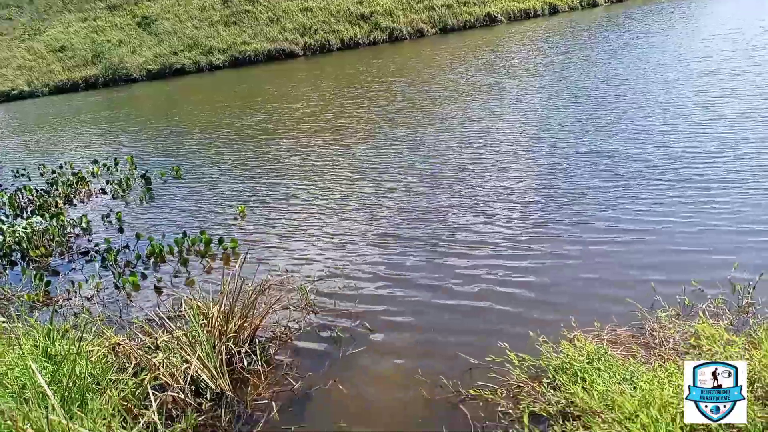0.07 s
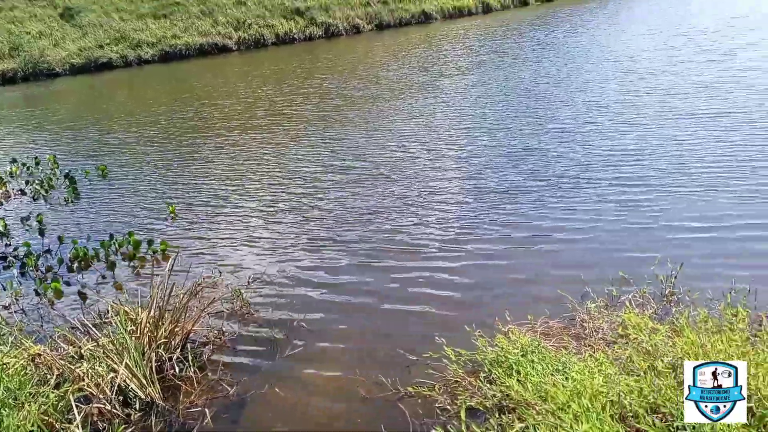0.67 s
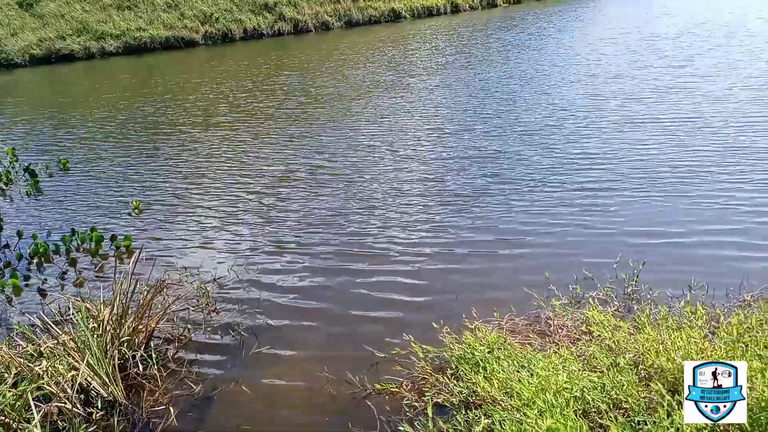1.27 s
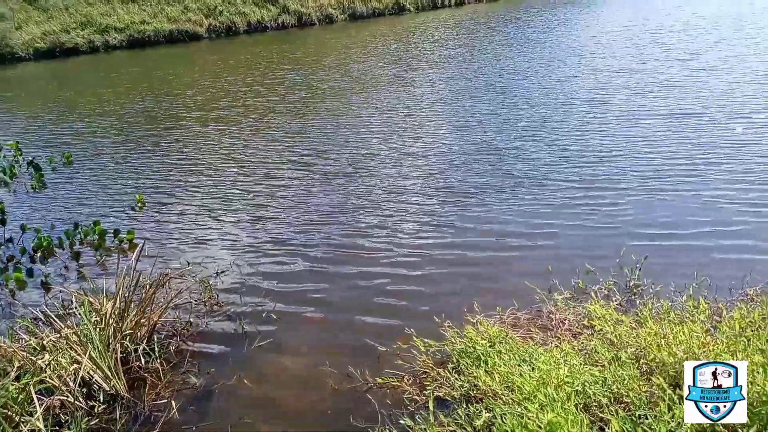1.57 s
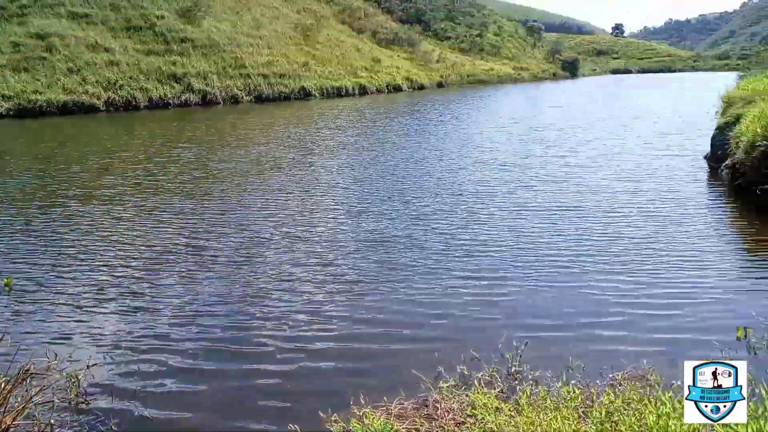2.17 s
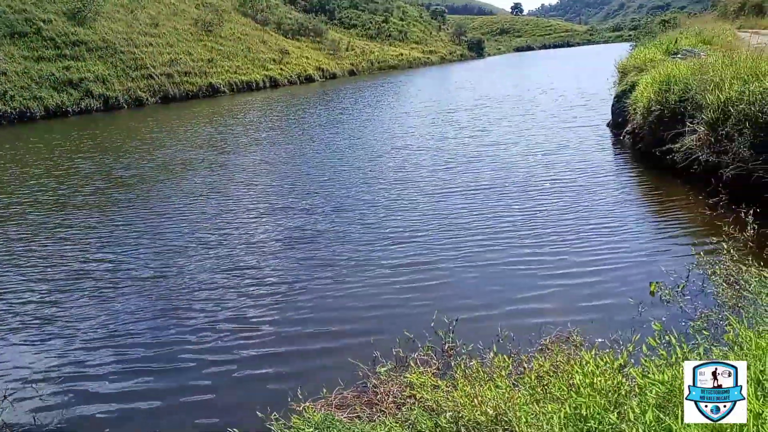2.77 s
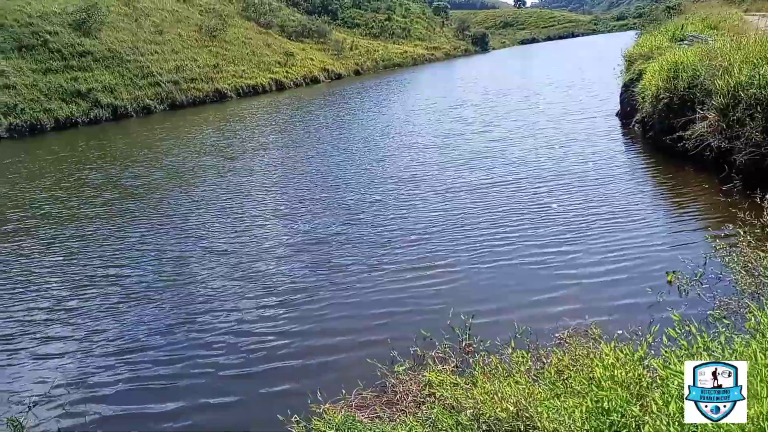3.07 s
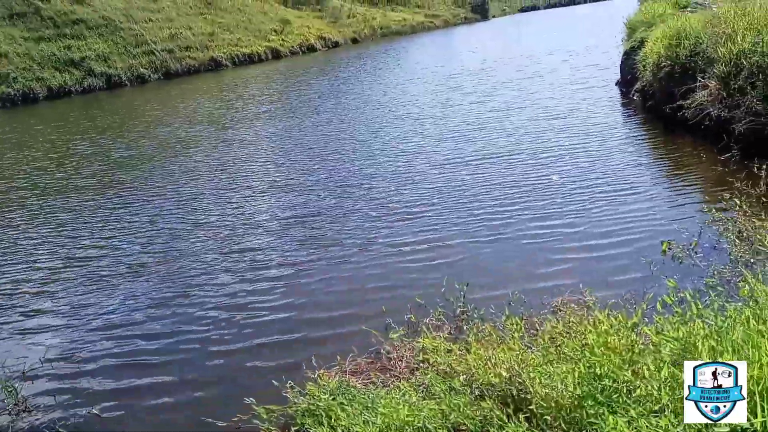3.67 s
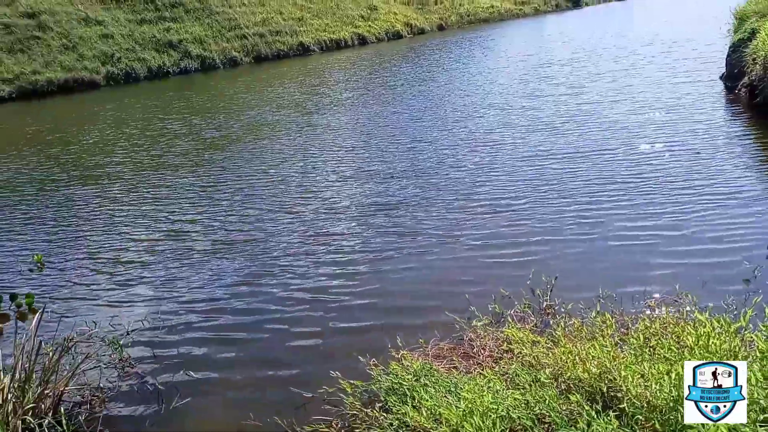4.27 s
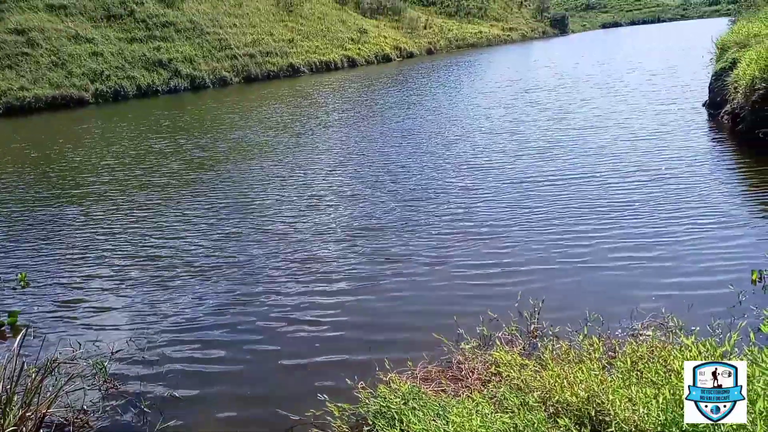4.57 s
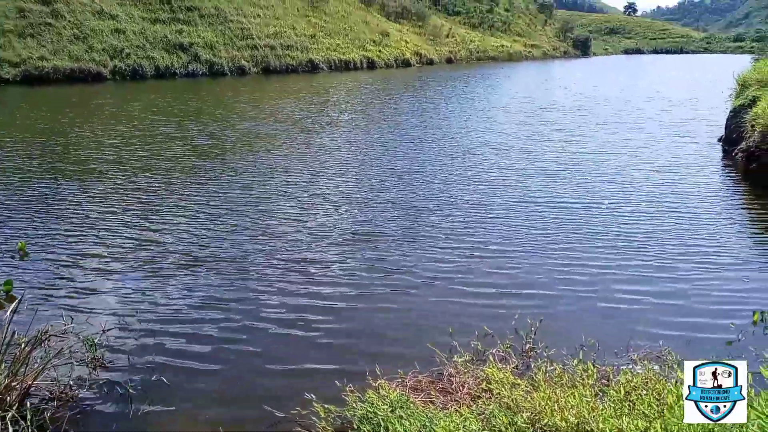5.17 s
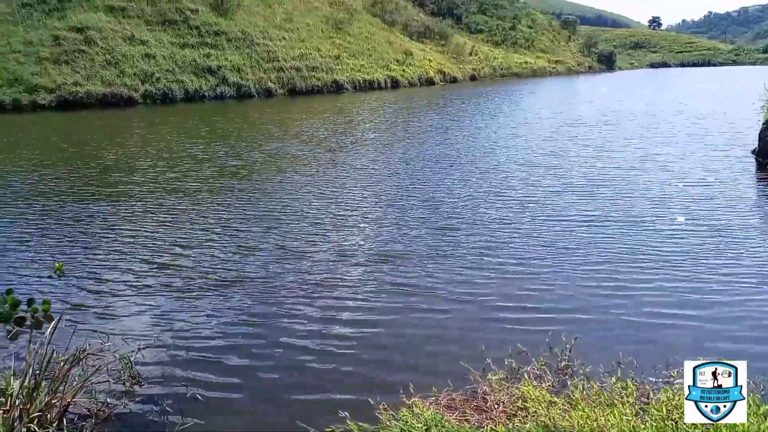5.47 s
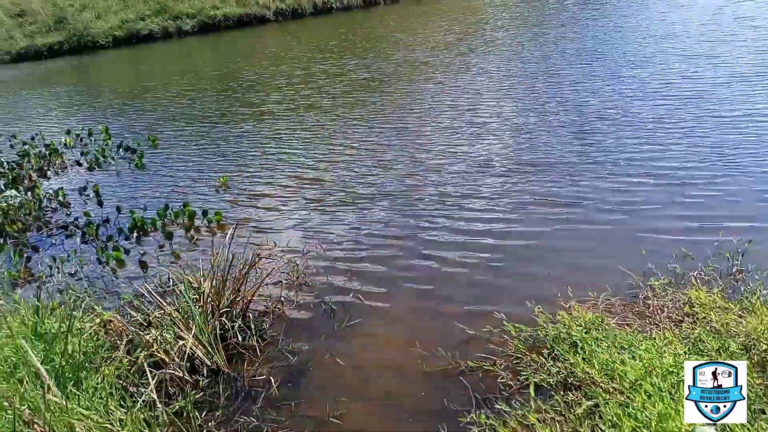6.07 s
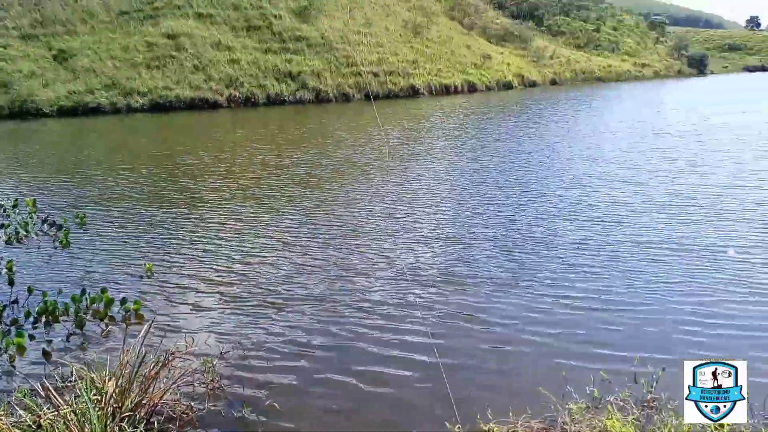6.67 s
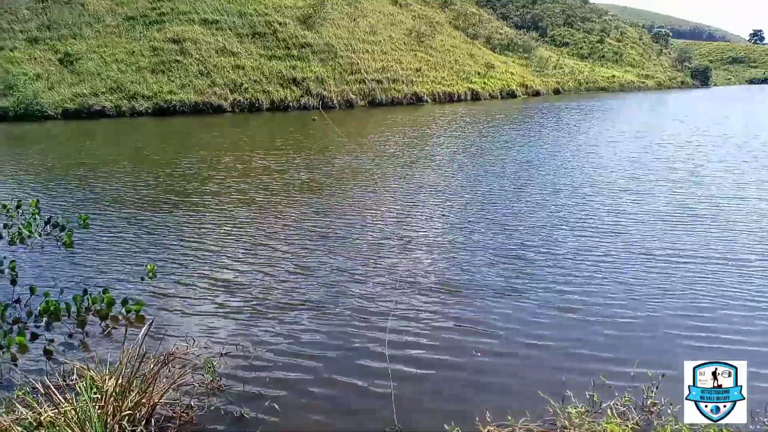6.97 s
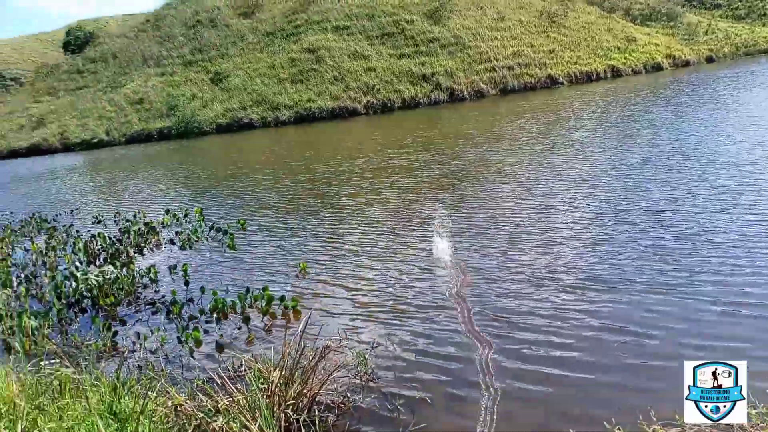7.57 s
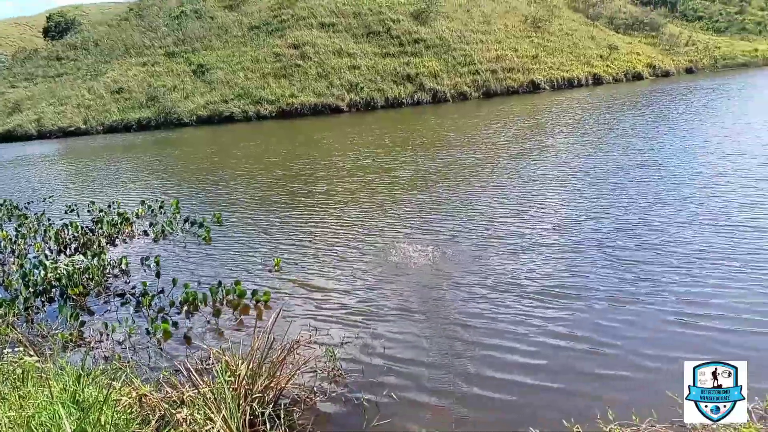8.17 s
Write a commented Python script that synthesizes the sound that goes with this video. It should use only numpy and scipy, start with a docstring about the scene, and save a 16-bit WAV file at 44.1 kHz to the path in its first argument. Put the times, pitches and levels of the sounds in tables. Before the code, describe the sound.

A thrown magnet on a rope slaps and plunks into water after a stretch of high insect buzzing, crickets and faint rope handling.

```python
"""A heavy magnet on a rope is thrown into a pond from a grassy bank.
Throughout, a high insect buzz swells in bouts over a second, steady one; a bird whistles now and then,
and crickets join in, scraping their wings. At first hands shift on the rope, whose fibres catch and
slip. At about 6 s the tackle snaps tight and the rope hisses out. At 7.4 s the magnet slaps the water
and its air cavity closes with a plunk. Last, spray patters back, trapping small bubbles that ring."""
import sys
import numpy as np
from scipy import signal
from scipy.fft import rfft, irfft
from scipy.io import wavfile

SR = 44100
rng = np.random.default_rng(int(sys.argv[2]) if len(sys.argv) > 2 else 0)


def log_audio(samples):
    """Write samples as a 16-bit WAV file to the path given in sys.argv[1]."""
    # one column per channel
    frames = np.atleast_2d(samples).T
    # limit to full scale, then quantise
    limited = np.clip(frames, -1, 1)
    pcm = np.round(limited * 32767).astype(np.int16)
    wavfile.write(sys.argv[1], SR, pcm)


N = 371763
T = np.arange(N) / SR
HZ = np.fft.rfftfreq(N, 1 / SR)

# Still air and hiss. Each row: frequency in Hz, relative spectral level in dB.
AIR_SPECTRUM = [(18, -56), (30, -1.5), (55, -32.5), (413, -17.5), (1120, -21.5), (1380, -17), (4150, -25.5),
                (5680, -20.5), (7010, -14), (7580, -24.5), (8420, -32.5), (10100, 4), (11200, -8.5),
                (12800, 1.5), (15800, -8.5)]
# Soft swells of the low murmur. Each row: centre in seconds, half length in seconds, rise in dB.
MURMUR_RISES = [(.3, .4, 4), (1.88, .1, 3), (2.43, .08, 3), (2.87, .05, 4), (5.68, .13, 6), (6.3, .35, 4)]
# Distant insects. Each row: centre frequency in Hz, width in Hz, level in dB before the swell.
CHORUS_BANDS = [(4710, 330, -75), (5530, 390, -75.5), (6290, 160, -79.5), (7016, 210, -76)]
# The swell of their chorus. Each row: time in seconds, gain in dB.
CHORUS_GAIN = [(0, -3), (1.2, -4), (2.3, 0.5), (3.4, -1.5), (3.9, -10), (4.7, -9), (5.2, -5), (8.4, 0)]
# Calls across the water. Each row: centre in seconds, a third of the length in seconds, pitch in Hz,
# level in dB, glide in octaves a second.
DISTANT_CALLS = [(2.015, .11, 332, -76.5, -0.31), (2.1, .05, 900, -80, .4), (2.09, .05, 1350, -81, 0),
                 (3.796, .06, 3400, -81, -0.75), (4.497, .11, 2640, -81.5, -0.63),
                 (5.158, 0.038, 5000, -71, 0.37), (5.679, 0.14, 1495, -71.5, .1),
                 (5.699, .11, 1730, -75, -0.11), (5.79, 0.11, 3480, -79, -.25),
                 (7.088, 0.063, 3050, -71.5, -0.94)]
# The main cricket grows higher and louder. Each row: time in seconds, pitch in Hz, peak level in dB.
CRICKET_CONTOUR = [(2.6, 6400, -59.5), (3.45, 6340, -60.5), (3.7, 6550, -57), (4.6, 6650, -57),
                   (5.4, 6650, -55.5), (7.1, 6630, -57), (8.4, 6740, -59)]
# Its phrases. Each row: start in seconds, chirps, strokes in the first chirp, strokes in the others.
CRICKET_PHRASES = [(2.57, 4, 1, 1), (2.949, 5, 2, 2), (3.431, 4, 2, 2), (3.81, 5, 2, 2), (4.289, 5, 3, 2),
                   (4.77, 5, 3, 2), (5.251, 4, 3, 2), (5.683, 1, 2, 2), (5.757, 7, 3, 2), (6.442, 6, 2, 2),
                   (7.077, 2, 2, 1), (7.684, 1, 2, 2), (7.759, 7, 3, 2)]
# A second, lower cricket. Each row: time in seconds, peak level in dB.
LOW_CRICKET_CHIRPS = [(1.421, -60), (2.744, -59), (4.215, -56), (5.631, -54.5), (7.005, -59)]
# One pulse of the insect buzzes. Each row: time in seconds, pitch in Hz, relative level in dB.
BUZZ_STROKE = [(0, 10300, -24), (.0007, 10370, -1), (.0032, 10400, 0), (.0058, 10360, 1),
               (.007, 10050, -11), (.0085, 9700, -15), (.0112, 9250, -28)]
# Bouts of the higher buzz. Each row: centre in seconds, half length in seconds, gain in dB.
HIGH_BUZZ_BOUTS = [(.37, .17, 5), (1.66, .15, 8), (2.02, .08, -3), (2.6, .12, 7.5), (2.92, .16, 3),
                   (3.58, .23, 6), (4.45, .3, 6), (5.35, .25, 2.5), (5.68, .05, -5), (6.3, .55, 4.5),
                   (8.15, .17, 5)]
# The top of each bird whistle. Each row: time in seconds, pitch in Hz, level in dB before the waver.
WHISTLE_TOPS = [(.008, 2780, -59), (2.11, 2830, -51), (6.29, 2850, -51.5)]

# Rope sliding on hands and grass. Each row: frequency in Hz, relative spectral level in dB.
ROPE_SPECTRUM = [(88, -70), (150, -38), (327, -16), (474, -33), (727, -9), (833, -13.5), (937, -9),
                 (1520, -11.5), (2680, -8.5), (3810, -6.5), (6700, -12), (8810, -33.5), (12500, -2),
                 (14100, -1), (15800, -9)]
# Rope pulled through the hand. Each row: centre and half length in seconds, body and fizz in dB.
# Body is the part of a texture below 8500 Hz, fizz the part above.
ROPE_PULLS = [(.2, .05, -67, -54), (.285, .042, -59, -48), (1.61, .04, -72, -53), (1.73, .04, -80, -56),
              (3.4, .06, -76, -56), (6.12, .04, -80, -54), (6.205, .015, -60, -54), (6.298, .012, -61, -43),
              (6.465, .05, -53, -42), (6.665, .025, -64, -44), (6.785, .03, -55, -49),
              (6.897, .025, -56, -41), (7.27, .07, -65, -52)]
# Short brushes and ticks. Each row: centre and half length in seconds, body and fizz in dB.
ROPE_BRUSHES = [(.621, .001, -73, -43.5), (1.415, .001, -71, -42.5), (1.887, .025, -64.5, -51),
                (2.186, .008, -74, -52), (2.21, .007, -61, -37), (2.391, .02, -55.5, -42),
                (2.446, .012, -64, -48), (2.49, .04, -68, -54), (2.972, .023, -70, -48),
                (3.081, .026, -65, -46.5), (3.377, .001, -71, -42), (3.575, .028, -67, -48),
                (4.065, .001, -75, -45), (4.958, .022, -67, -49.5), (6.163, .007, -48, -35),
                (6.342, .003, -46.5, -41), (6.391, .003, -52.5, -48), (6.505, .004, -53, -34),
                (6.678, .007, -49, -38), (6.848, .0025, -46, -34.5), (6.898, .0065, -57, -33.5),
                (7.127, .0026, -60.5, -33.5)]
# Resonances of the squeaking rope. Each row: frequency in Hz, width in Hz, level in dB.
SQUEAK_BANDS = [(2900, 110, -58), (4150, 150, -62), (5150, 330, -56)]
# Flicks of slack rope. Each row: start in seconds, level in dB, decay time in seconds.
SLACK_FLICKS = [(1.413, -63, .012), (2.328, -67, .005), (2.865, -68, .01), (6.34, -48, .004),
                (6.708, -42.5, .004), (6.7156, -33, 0.003), (6.722, -49, 0.069), (6.837, -46, .004),
                (6.847, -48, .005), (7.027, -56, .012)]
# Their dull tone. Each row: frequency in Hz, relative spectral level in dB.
FLICK_SPECTRUM = [(200, -19), (600, -2), (1100, 1.5), (2800, -2), (4500, -15), (7000, -30), (16000, -45)]
# Modes of the tackle. Each row: frequency in Hz, relative level in dB, t60 and delay in seconds.
TACKLE_MODES = [(990, -25, .0037, .00087), (2756, -15, .005, .00041), (3770, -14.2, .0017, .00078),
                (5390, -19.5, .0045, .00024), (12770, -2.4, .0015, 0), (14300, -6.2, .0006, 0)]

# Water torn by the magnet. Each row: frequency in Hz, relative spectral level in dB.
SPLASH_SPECTRUM = [(59, -67.5), (100, -29), (129, -34), (219, -20), (431, -14), (618, -5), (849, -19),
                   (1170, -6), (1440, -14), (2200, -12.5), (2500, -13.5), (4720, -16), (8550, -27),
                   (12500, 7), (15800, -1)]
# Four bursts of it: the slap, the cavity opening, its collapse, the rebound jet.
# Each row: start, rise and decay time in seconds, body and fizz in dB.
SPLASH_BURSTS = [(7.362, .002, .004, -44, -31), (7.366, .016, .034, -38.5, -41),
                 (7.44, .045, .04, -42.5, -38.5), (7.549, .002, .035, -47, -39)]
# The flat face cracks on the surface; the air cavity rings as it opens and again as it pinches off.
# Each row: frequency in Hz, peak level in dB, rise and t60 in seconds, glide in octaves a second.
SLAP_MODES = [(2950, -27, .0005, .009, 0), (3750, -27, .0003, .006, 0), (4800, -31, .0003, .005, 0)]
OPENING_MODES = [(390, -41, .0036, .19, -21), (1210, -51, .0027, .06, 2)]
PLUNK_MODES = [(100, -52, .006, .11, -2.5), (195, -33, .004, .055, 4.5), (289, -19.5, .0033, .06, -.5),
               (742, -21.5, .002, .034, 4), (1230, -29.5, .0015, .022, 5)]
# Large bubbles. Each row: start in seconds, starting pitch in Hz, peak level in dB.
LARGE_BUBBLES = [(7.452, 1190, -46), (7.473, 335, -42), (7.537, 530, -40), (7.5635, 630, -34),
                 (7.584, 550, -41), (7.663, 1650, -40.5), (7.839, 1090, -43.5), (7.88, 1140, -43.5),
                 (7.922, 615, -43), (8.0, 1090, -38), (8.002, 710, -40), (8.113, 1150, -46)]
# The patter of spray. Each row: frequency in Hz, relative spectral level in dB.
SPRAY_SPECTRUM = [(120, -64.5), (200, -30), (681, -4), (879, -10), (1140, 0), (1440, -6.5), (1640, 0.5),
                  (1830, -3), (6450, -9.5), (8640, -25), (10200, -22), (12500, -1.5), (15800, -12.5)]
# Showers falling back. Each row: centre and half length in seconds, body and fizz in dB.
SPRAY_SHOWERS = [(7.655, .085, -52.5, -51), (7.85, .03, -55, -62), (8.015, .095, -48, -49),
                 (8.26, .13, -72, -55), (8.415, .015, -55, -52)]
# Single drops. Each row: start in seconds, relative level in dB, starting pitch in Hz.
SINGLE_DROPS = [(7.6352, -30.5, 2250), (7.8507, -34, 2090), (8.0487, -36, 1560), (8.1254, -36, 5120),
                (8.1653, -28.5, 4500), (8.2133, -41, 4100), (8.3103, -28, 4700), (8.3544, -39, 6600),
                (8.3793, -33, 6620), (8.4157, -30, 3800), (8.4224, -30.5, 6160)]


def amp(db):
    """Amplitude grows tenfold for every 20 dB."""
    return 10 ** (np.asarray(db) / 20)


def unit(x):
    """Normalisation brings a signal to rms 1."""
    return x / np.sqrt(np.mean(x ** 2) + 1e-20)


def add(mix, s, sound):
    """Superposition: a sound adds to the mix from s seconds on."""
    part = mix[max(round(s * SR), 0):][:len(sound)]
    part += sound[:len(part)]


def colour(x, spectrum):
    """Spectral shaping: the gain follows (Hz, dB) points along a logarithmic frequency axis."""
    hz, db = np.transpose(spectrum)
    return irfft(rfft(x) * amp(np.interp(np.log(HZ + 1), np.log(hz + 1), db)), N)


def band(x, low_hz, high_hz):
    """A band-pass filter with steep, smooth edges."""
    return irfft(rfft(x) / (1 + (low_hz / (HZ + 1)) ** 10) / (1 + (HZ / high_hz) ** 10), N)


def narrow_band(x, hz, width):
    """A Gaussian filter passes the frequencies near hz."""
    return irfft(rfft(x) * np.exp(-.5 * ((HZ - hz) / width) ** 2), N)


def drift(rate_hz):
    """Low-passed noise gives a random fluctuation of rms 1."""
    return unit(irfft(rfft(rng.standard_normal(N)) * np.exp(-np.minimum(HZ / rate_hz, 10) ** 2), N))


def grains(per_s, spread_db):
    """A Poisson process of clicks, a few of them large."""
    size = amp(spread_db * np.minimum(rng.exponential(1, N), 4))
    return unit(size * rng.choice([-1, 1], N) * (rng.random(N) < per_s / SR))


def two_bands(texture, body, fizz):
    """A crossover gives the body and the fizz of a texture their own gains."""
    return body * unit(band(texture, 20, 8500)) + fizz * unit(band(texture, 8500, SR / 2))


def bell(s, half, edge=4):
    """A smooth envelope: 1 at time s, one half at s - half and s + half."""
    return 1 / (1 + abs((T - s) / half) ** edge)


def swells(rows, edge=4):
    """Bell envelopes sum to a body gain and a fizz gain."""
    return sum(amp([[body], [fizz]]) * bell(s, half, edge) for s, half, body, fizz in rows)


def envelope(start, rise, end, decay):
    """A linear rise from start, a hold until end, then exponential decay."""
    return np.clip((T - start) / rise, 0, 1) * np.exp(-np.maximum(T - end, 0) / decay)


def ring_envelope(age, rise, t60):
    """A damped resonance builds up, then loses 60 dB every t60 seconds."""
    return (1 - np.exp(-(age / rise) ** 2)) * np.exp(-np.log(1000) * age / t60)


def phase(hz):
    """Phase in radians is the running integral of frequency."""
    return 2 * np.pi * np.cumsum(hz) / SR


def bank_scatter(x, wet_db, t60):
    """Scattering from the banks adds a faint, decaying tail."""
    t = T[:SR // 2]
    tail = rng.standard_normal(len(t)) * amp(-60 * t / t60) * (t > .004)
    return x + amp(wet_db) * signal.fftconvolve(x, tail / np.linalg.norm(tail))[:N]


def air(noise_db=-75.5, murmur_db=-80.3, flutter_db=2):
    """Broadband ambient noise: an even hiss over a low, wavering murmur."""
    noise = colour(rng.standard_normal(N), AIR_SPECTRUM)
    noise *= amp(noise_db) / np.std(band(noise, 100, 4000))
    swell_db = sum(db * bell(s, half) for s, half, db in MURMUR_RISES)
    murmur = unit(band(noise, 55, 1064)) * amp(murmur_db + swell_db + flutter_db * drift(14))
    middle = amp(-2.5) * band(noise, 1074, 4200)
    treble = amp(-5.5) * band(noise, 3900, 9300)
    hiss = amp(-2) * band(noise, 11300, SR / 2)
    return murmur + middle + treble + hiss


def insect_chorus(throb_db=3.5):
    """Incoherent summation: many far insects merge into throbbing bands of noise."""
    out = np.zeros(N)
    for hz, width, db in CHORUS_BANDS:
        voices = narrow_band(rng.standard_normal(N), hz, width)
        out += amp(db) * unit(voices * amp(throb_db * drift(18)))
    return out * amp(np.interp(T, *np.transpose(CHORUS_GAIN)))


def far_calls(blur=.055):
    """Spectral broadening: distance smears each call into a narrow, fuzzy band."""
    out = np.zeros(N)
    for s, third, hz, db, glide in DISTANT_CALLS:
        t = np.arange(-1.5 * third, 1.5 * third, 1 / SR)
        scatter = (drift(blur * hz) + 1j * drift(blur * hz))[:len(t)]
        tone = (scatter * np.exp(1j * phase(hz * 2 ** (glide * t)))).real
        add(out, s + t[0], amp(db) * unit(tone) * signal.windows.tukey(len(t), .7))
    return out


def wing_stroke(hz, length, crest, droop):
    """Stridulation: a file scrapes over a wing; the pitch arches, then sags as the wing slows."""
    progress = np.arange(0, 1, 1 / (length * SR))
    pitch = hz * (1 + .0053 * rng.standard_normal()) * (1 - droop * (progress - crest) ** 2)
    return np.sin(phase(pitch)) * np.sin(np.pi * progress ** .8) ** .77


def crickets(chirp_period_s=.1014, spacing_s=.026, lead_s=.0081, extra_stroke_chance=.1):
    """Two crickets stridulate in chirps; the main one restarts its even beat with each phrase."""
    out = np.zeros(N)
    times, pitches, levels = np.transpose(CRICKET_CONTOUR)
    for start, chirps, first, others in CRICKET_PHRASES:
        for n in range(round(chirps)):
            s = start + n * chirp_period_s
            strokes = round(others) + (rng.random() < extra_stroke_chance) if n else round(first)
            for k in range(strokes):
                stroke = wing_stroke(np.interp(s, times, pitches), length=.018, crest=.36, droop=.24)
                add(out, s - lead_s + k * spacing_s, amp(np.interp(s, times, levels)) * stroke)
    for s, db in LOW_CRICKET_CHIRPS:
        for k in range(3):
            hz = 5240 + 50 * rng.standard_normal()
            stroke = wing_stroke(hz, length=.023, crest=rng.uniform(.1, .5), droop=.18)
            add(out, s - lead_s + k * .0245, amp(db) * stroke)
    return bank_scatter(out, wet_db=-12, t60=.17)


def insect_buzzes(strokes_per_s=63.1, echo_s=.005134, echo_db=-8, high_db=-66, low_db=-63, waver_db=.7):
    """Two buzzes of rapid stridulation, comb-filtered by interference with a ground echo."""
    times, hz, db = np.transpose(BUZZ_STROKE)
    t = T[:round(times[-1] * SR)]
    stroke = amp(np.interp(t, times, db)) * np.exp(1j * phase(np.interp(t, times, hz)))
    stroke_count = np.floor(np.cumsum(strokes_per_s * (1 + .003 * drift(2))) / SR)
    beats = np.diff(stroke_count, prepend=0)
    phase_jitter = 2 * drift(5) + .45 * rng.standard_normal(N)
    buzz = signal.fftconvolve(beats * np.exp(1j * phase_jitter), stroke)[:N].real
    comb = 1 + amp(echo_db) * np.exp(-2j * np.pi * HZ * echo_s)
    buzz = unit(irfft(rfft(buzz) * comb, N))
    # A high buzz near 10.4 kHz swells in bouts over a second, steady, falling buzz just below it.
    low_buzz = irfft(rfft(buzz) * np.interp(HZ, [9900, 10200], [1, 0]), N)
    high_buzz = buzz - low_buzz
    bouts_db = sum(gain_db * bell(s, half) for s, half, gain_db in HIGH_BUZZ_BOUTS)
    return high_buzz * amp(high_db + bouts_db + waver_db * drift(5)) + low_buzz * amp(low_db)


def bird(onset_s=.02, climb_s=.125, drop_s=.02, climb_hz_per_s=4700, drop_hz_per_s=22000):
    """Frequency modulation of a pure tone: each trembling whistle climbs, swells and drops away."""
    climb_db_per_s, waver_db = 35, 2.7
    out = np.zeros(N)
    tremble = drift(64) + .4 * drift(25)
    for s, top_hz, db in WHISTLE_TOPS:
        before = np.clip(s - T, 0, climb_s + onset_s)
        after = np.clip(T - s, 0, drop_s)
        pitch = (top_hz - climb_hz_per_s * before - drop_hz_per_s * after) * (1 + .011 * tremble)
        gate = np.minimum((climb_s + onset_s - before) / onset_s, 1) * (1 - after / drop_s)
        out += gate * amp(db - climb_db_per_s * before) * np.sin(phase(pitch))
    return bank_scatter(out * amp(waver_db * drift(110)), wet_db=-12.5, t60=.35)


def sleeve(s=.28, half=.07, db=-63):
    """Friction of cloth makes a soft swish as the arm moves."""
    return amp(db) * bell(s, half) * unit(band(rng.standard_normal(N), 550, 1760))


def rope_slide(catch_db=2, snap_db=-9):
    """Stick-slip friction: the rope creeps through the grip, runs out at the throw, then slackens."""
    fibres = colour(grains(per_s=8000, spread_db=3), ROPE_SPECTRUM) * amp(catch_db * drift(64))
    snaps = colour(grains(per_s=22, spread_db=3), ROPE_SPECTRUM)  # single fibres let go
    grip_db, payout_db = [[-84], [-59.5]], [[-59], [-43.5]]  # body and fizz of each
    grip = amp(grip_db) * envelope(start=0, rise=.01, end=1.95, decay=.3)
    speed = envelope(start=6.05, rise=.4, end=6.88, decay=.16)
    slide = grip + amp(payout_db) * speed ** 1.2 + swells(ROPE_PULLS)
    return two_bands(fibres, *slide) + amp(snap_db) * two_bands(snaps, *grip)


def rope_brushes(firm_db=-43):
    """Brief friction on the rope: the firmer the brush, the lower its spectrum reaches."""
    body, fizz = swells(ROPE_BRUSHES, edge=2.6)
    fibres = colour(grains(per_s=11000, spread_db=2.4), ROPE_SPECTRUM)
    firmness = np.minimum(body / amp(firm_db), 1) ** .4
    lower = .85 * firmness * body * unit(band(fibres, 1300, 3400))
    return two_bands(band(fibres, 3600, SR / 2), body, fizz) + lower


def rope_squeak(s=2.21, half=.007):
    """Friction excites a few narrow resonances as the grip tightens."""
    rub = rng.standard_normal(N)
    rasp = sum(amp(db) * unit(narrow_band(rub, hz, width)) for hz, width, db in SQUEAK_BANDS)
    return bell(s, half, edge=3) * rasp


def rope_flicks():
    """Slack rope flaps in dull bursts of noise that decay exponentially."""
    level = sum(amp(db) * (T >= s) * np.exp(-abs(T - s) / decay) for s, db, decay in SLACK_FLICKS)
    noise = unit(colour(rng.standard_normal(N), FLICK_SPECTRUM))
    return band(level * noise, 410, 8000)


def tackle_snap(s=6.18375, peak_db=-2.6):
    """Impulse excitation: the tackle snaps tight and its heavily damped modes ring briefly."""
    t, out = T[:SR // 20], np.zeros(N)
    for hz, db, t60, delay in TACKLE_MODES:
        age = np.maximum(t - delay, 0)
        ring = ring_envelope(age, rise=.0002, t60=t60)
        add(out, s, amp(db) * ring / ring.max() * np.sin(2 * np.pi * hz * age))
    bass_cut = signal.butter(2, 600, "highpass", fs=SR, output="sos")  # the snap stays thin, with no low thud
    out = signal.sosfilt(bass_cut, out)
    out = signal.lfilter(*signal.iirnotch(8500, Q=2, fs=SR), out)
    return amp(peak_db) * out / abs(out).max()


def bubble(hz, rise, t60, glide):
    """An air pocket pulses, gliding in octaves a second; the change of its flow radiates pressure."""
    t = T[:SR // 8]
    flow = ring_envelope(t, rise, t60) * np.sin(phase(hz * 2 ** (glide * t)))
    pressure = np.gradient(flow)
    return pressure / abs(pressure).max()


def froth(per_s, spread_db, cycles, sizes=28):
    """Small bubbles resonate at random times, each size at its own pitch."""
    out = np.zeros(N)
    for hz in np.geomspace(450, 6500, sizes) * rng.uniform(.95, 1.05, sizes):
        ring = bubble(hz, rise=1 / hz, t60=cycles / hz, glide=4.6)
        out += np.sqrt(hz) * unit(signal.oaconvolve(grains(per_s, spread_db), ring)[:N])
    return unit(out)


def spray(small_bubbles, tick_db=-8, clump_db=2.4):
    """Many tiny impacts and bubbles superpose into showers of patter."""
    ticks = amp(tick_db) * grains(per_s=2500, spread_db=6)
    patter = colour(ticks + small_bubbles, SPRAY_SPECTRUM) * amp(clump_db * drift(45))
    return two_bands(patter, *swells(SPRAY_SHOWERS))


def drops(bubble_gain_db=-4.5, tick_db=-32):
    """Air entrainment: each drop ticks on the surface and traps a tiny, ringing bubble."""
    out = np.zeros(N)
    for s, db, hz in SINGLE_DROPS:
        add(out, s, amp(tick_db) * bubble(12700, rise=.0001, t60=.0027, glide=0))
        add(out, s, amp(db + bubble_gain_db) * bubble(hz, rise=.00015, t60=.006, glide=23))
    return out


def large_bubbles(rise_cycles=1.6, ring_cycles=28):
    """Damping scales with frequency, so the lower of these rising bubbles ring longer."""
    out = np.zeros(N)
    for s, hz, db in LARGE_BUBBLES:
        add(out, s, amp(db) * bubble(hz, rise_cycles / hz, ring_cycles / hz, glide=3))
    return out


def torn_water(small_bubbles):
    """The impact tears the surface into broadband bursts of clicks and froth."""
    torn = colour(grains(per_s=7000, spread_db=1.5) + .68 * small_bubbles, SPLASH_SPECTRUM)
    gains = sum(amp([[body], [fizz]]) * envelope(s, rise, s + rise, decay)
                for s, rise, decay, body, fizz in SPLASH_BURSTS)
    return two_bands(torn, *gains)


def slap_and_plunk(slap_s=7.364, opens_s=7.385, shuts_s=7.486):
    """Cavity resonance: after the slap, the air behind the magnet rings as it opens and shuts."""
    out = np.zeros(N)
    for s, modes in (slap_s, SLAP_MODES), (opens_s, OPENING_MODES), (shuts_s, PLUNK_MODES):
        for hz, db, rise, t60, glide in modes:
            add(out, s, amp(db) * bubble(hz, rise, t60, glide))
    return out


def magnet_splash():
    """Water entry: impact and cavity, then bubbles and spray, all scattered by the banks."""
    small_bubbles = froth(per_s=70, spread_db=3, cycles=34)
    entry = slap_and_plunk() + torn_water(small_bubbles)
    aftermath = large_bubbles() + spray(small_bubbles) + drops()
    return bank_scatter(entry + aftermath, wet_db=-12.5, t60=.17)


def scene():
    """The bank, its animals and the throw superpose in one channel."""
    bank = air() + insect_chorus() + far_calls() + crickets() + insect_buzzes() + bird()
    handling = sleeve() + rope_slide() + rope_brushes() + rope_squeak() + rope_flicks()
    return (bank + handling + tackle_snap() + magnet_splash())[None]


def record(dry):
    """Band limiting: a small microphone loses the deep bass, and a low-pass cuts the top treble."""
    bass_cut = signal.butter(2, 80, "highpass", fs=SR, output="sos")
    treble_cut = signal.firwin(301, 15900, window=("kaiser", 8), fs=SR)
    return signal.oaconvolve(signal.sosfilt(bass_cut, dry), treble_cut[None], "same")


dry = scene()
out = record(dry)
log_audio(out)
```